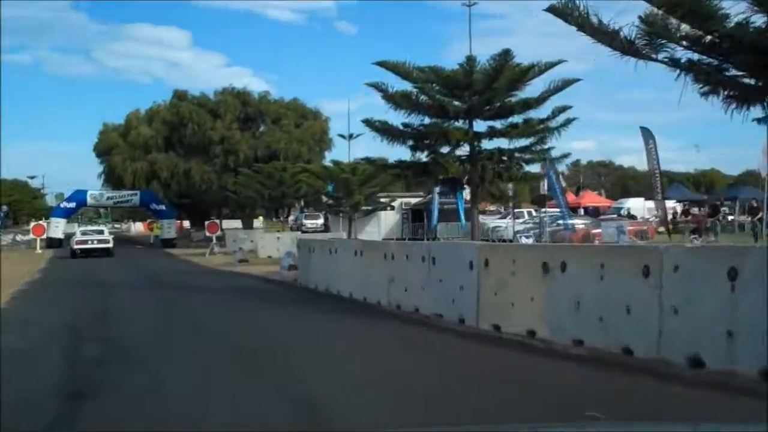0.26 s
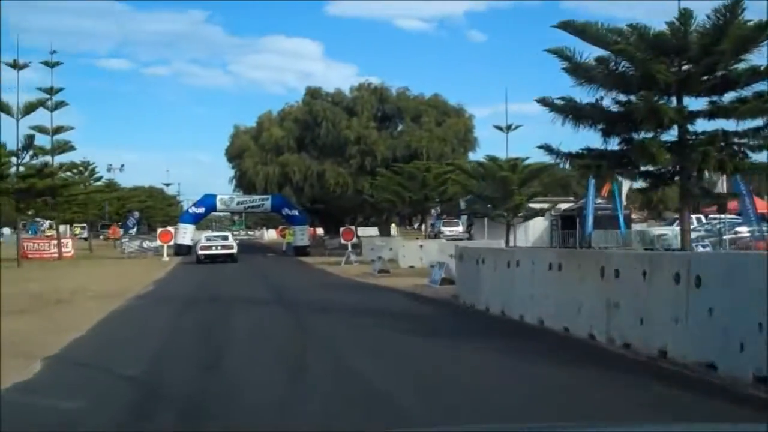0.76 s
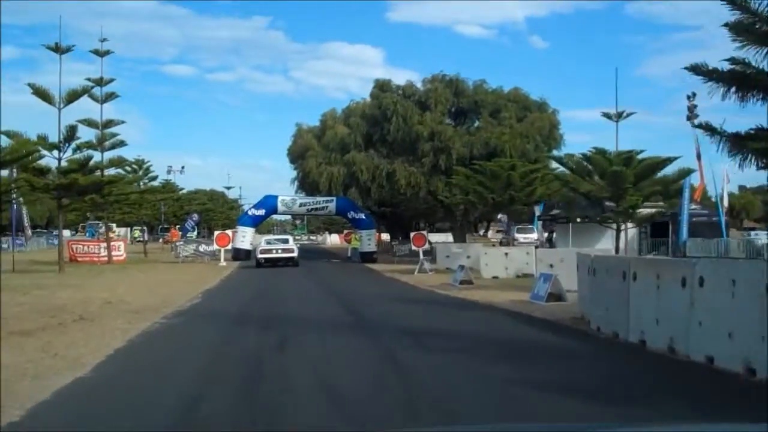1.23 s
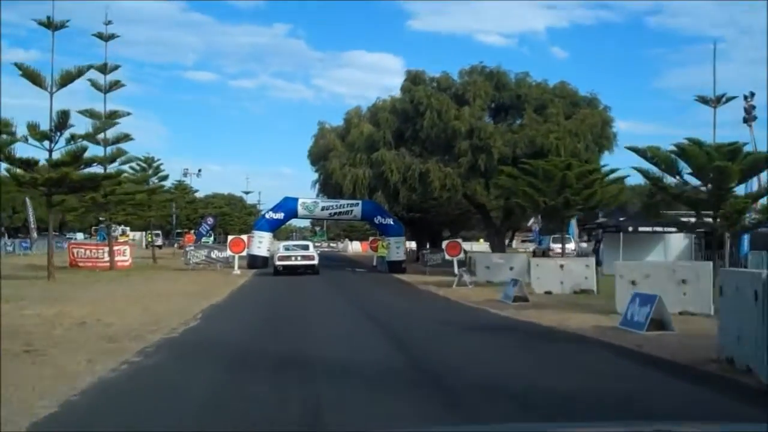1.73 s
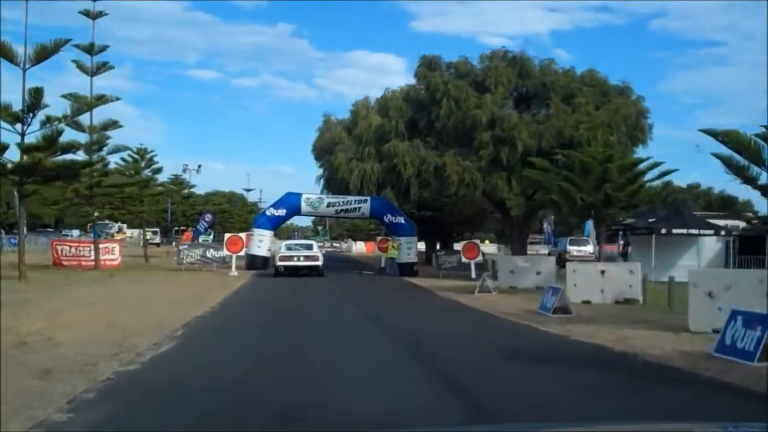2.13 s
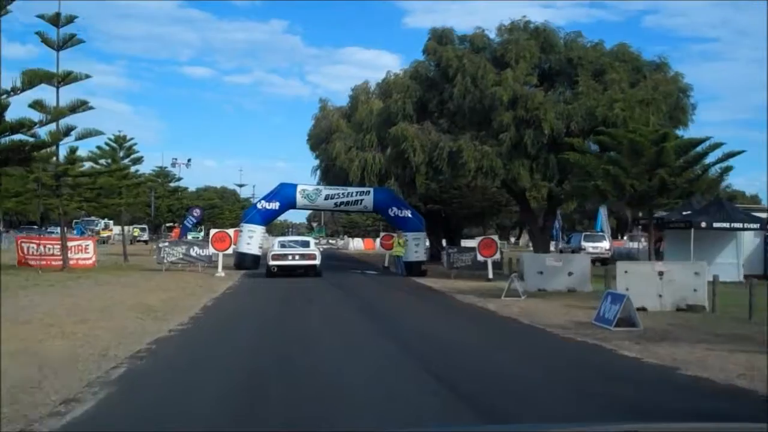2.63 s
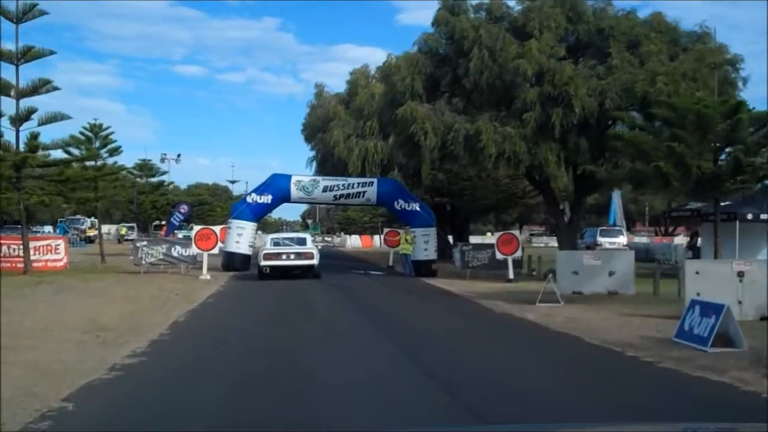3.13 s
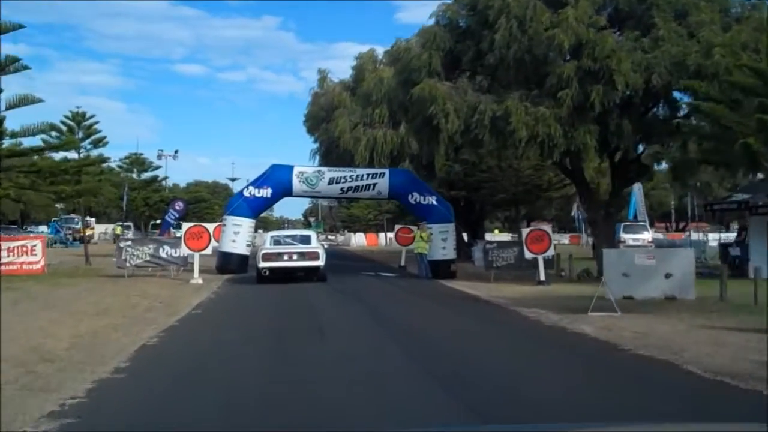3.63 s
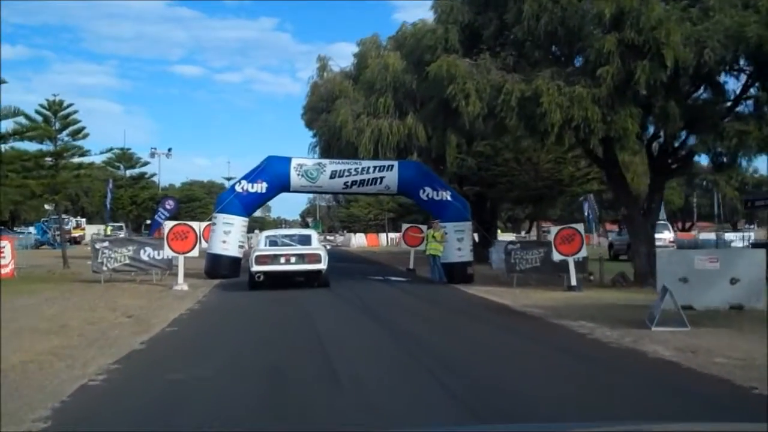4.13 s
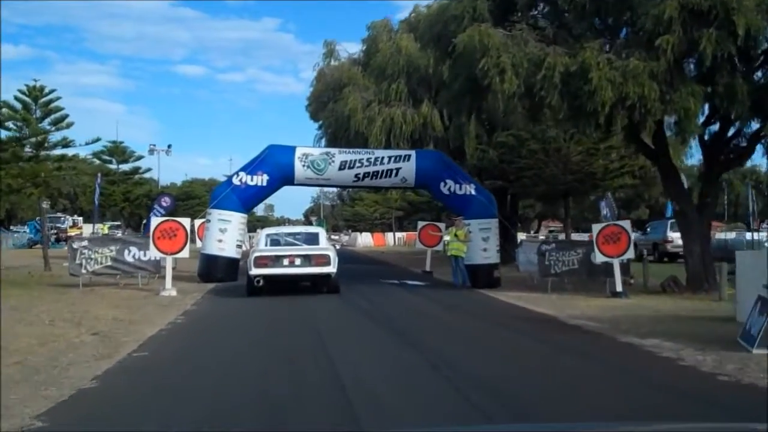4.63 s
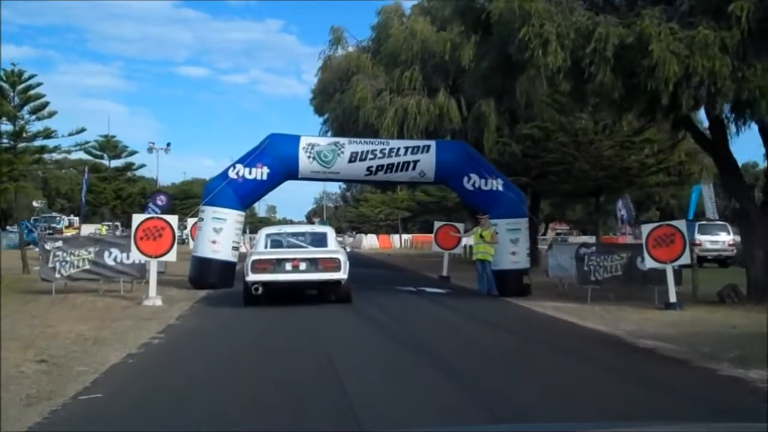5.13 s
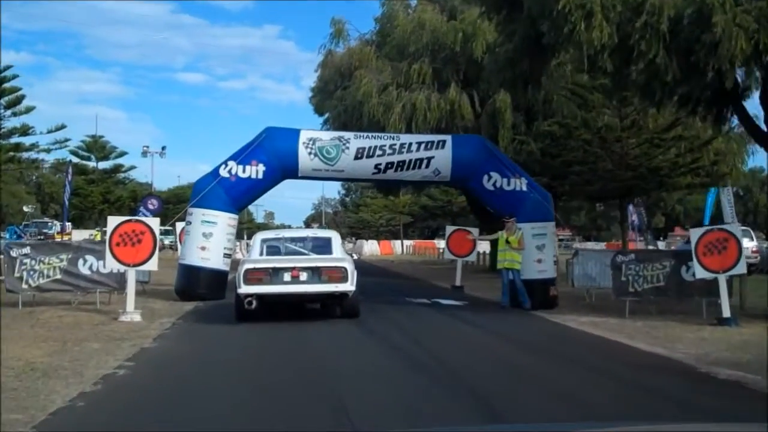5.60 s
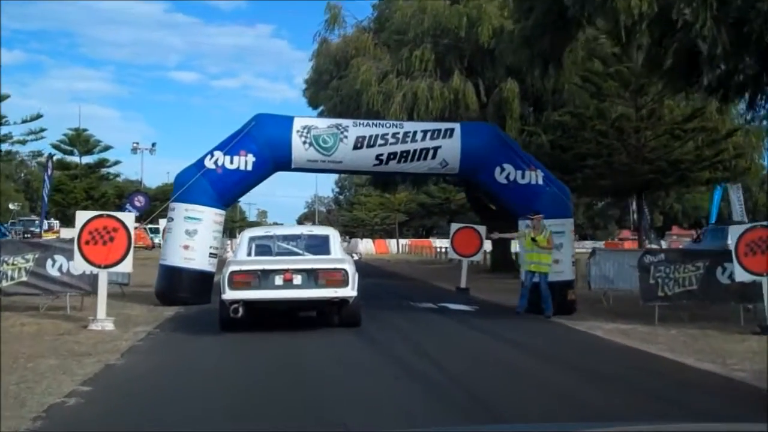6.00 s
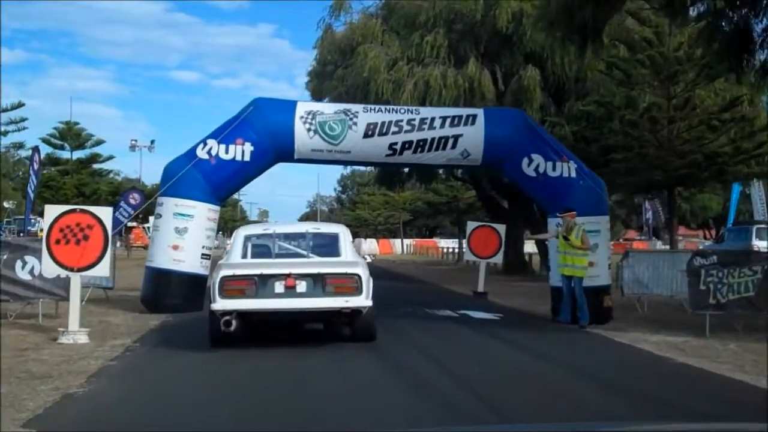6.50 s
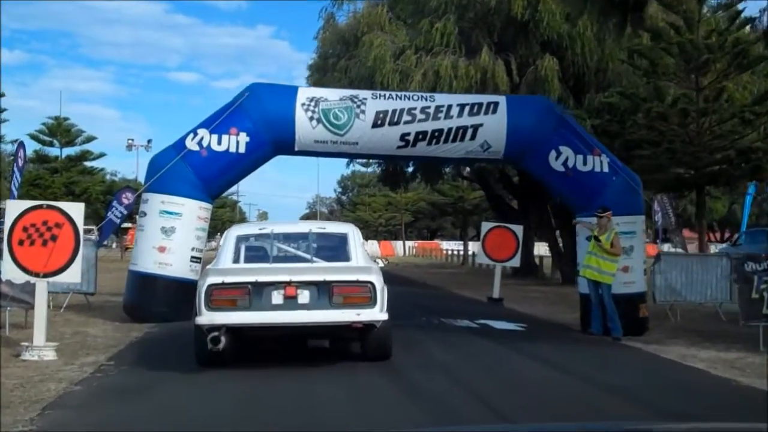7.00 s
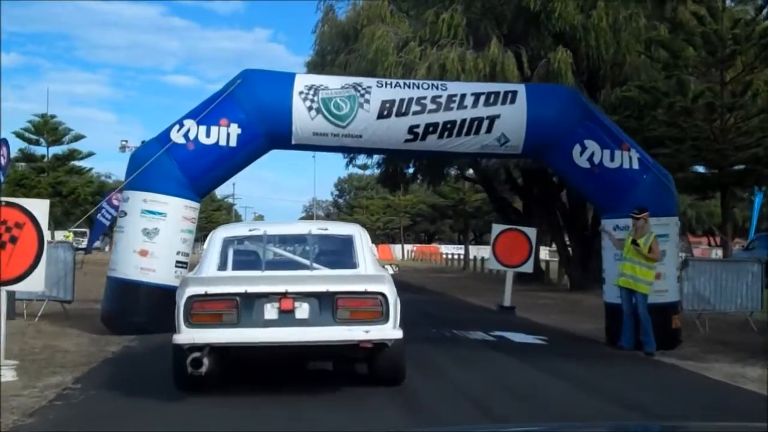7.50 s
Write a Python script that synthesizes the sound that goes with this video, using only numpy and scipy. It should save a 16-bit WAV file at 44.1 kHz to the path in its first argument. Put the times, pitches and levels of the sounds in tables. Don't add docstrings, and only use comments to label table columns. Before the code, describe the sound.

Close cabin sound from a small camera with light hiss. From 0 to 1.4 s the car's own engine booms steadily low, slowly falling, over broad tyre roar; thin brake squeaks chirp near 0, 1 and 1.4 s, with trim and grit ticks. At about 1.5 to 1.75 s a downshift blip rises sharply, followed by more squeaks and a heavy bump at 1.9 s. Revs then slide down to a rough idle by 3.3 s, as road roar fades and an unsteady gear whine descends. Bumps thud around 3.2, 3.4 and 4.6 s; a small throttle nudge lifts the engine from 4.5 to 5.2 s, then it creeps. From 5.3 s a lumpy low idle from the car ahead emerges. It blips at 6.7 to 6.9, 7.05 to 7.17 and 7.26 to 7.35 s, with boomy, ragged barks, then pulls with hot rasp and metallic buzz to the end.

```python
import sys
import numpy as np
from scipy import signal
from scipy.io import wavfile
from scipy.ndimage import uniform_filter1d

SR = 44100
rng = np.random.default_rng(int(sys.argv[2]) if len(sys.argv) > 2 else 0)


def volts_from_db(level):
    exponent = np.asarray(level, float) / 20
    return 10 ** exponent


def store_wav(level_fs):
    pcm = np.round(np.clip(np.atleast_2d(level_fs), -1, 1) * 32767)
    wavfile.write(sys.argv[1], SR, pcm.T.astype(np.int16))


N = 341775


def rms_one(x):
    return x / np.sqrt(np.mean(x ** 2) + 1e-20)


def evened(x, window_s):
    return x / np.sqrt(uniform_filter1d(x ** 2, size=round(window_s * SR)) + 1e-12)


def in_time(rows):
    t_s, *columns = np.transpose(rows)
    return [np.interp(np.arange(N) / SR, t_s, column) for column in columns]


def while_on(start_s, end_s, fade_s):
    corners_s = [start_s - fade_s, start_s, end_s, end_s + fade_s]
    return np.interp(np.arange(N) / SR, corners_s, [0, 1, 1, 0])


def at_hz(points, hz):
    f_hz, value = np.array(points).T
    return np.interp(np.log(hz), np.log(f_hz), value)


def left_right(lean_db):
    return volts_from_db(np.array([[lean_db], [-lean_db]]))


def swells(rows, rise_db_s, fall_db_s):
    t = np.arange(N) / SR
    power = 0
    for peak_s, db in rows:
        below_db = np.where(t < peak_s, rise_db_s * (peak_s - t), fall_db_s * (t - peak_s))
        power = power + volts_from_db(2 * (db - below_db))
    return power


def drift(rate_hz):
    r = np.exp(-80 * np.pi * rate_hz / SR)
    slow = signal.lfilter([1], [1, -2 * r, r * r], rng.standard_normal(N // 40 + 2002))[2000:]
    return np.interp(np.arange(N) / 40, np.arange(len(slow)), rms_one(slow))


def resonate(x, modes):
    out = 0
    for k, (hz, width_hz, db) in enumerate(modes):
        r = np.exp(-np.pi * width_hz / SR)
        poles = [1, -2 * r * np.cos(2 * np.pi * hz / SR), r * r]
        ring = signal.lfilter([(1 - r * r) / 2, 0, (r * r - 1) / 2], poles, x)
        out = out + (-1) ** k * volts_from_db(db) * ring
    return out


def tone(turns, db, wobble_db, wander, rate):
    level = np.sqrt(2) * volts_from_db(db + wobble_db * drift(rate))
    return level * np.sin(2 * np.pi * turns + wander * drift(rate) + rng.uniform(0, 2 * np.pi))


# f/Hz, likeness (1 = same)
LIKENESS = [(60, 0.95), (180, 0.99), (530, 0.94), (1550, 0.61), (4590, 0.02), (13600, 0.07)]
# f/Hz, level/dB
LEAN = [(60, 0.5), (230, 0.5), (900, 0.5), (3500, 1), (13600, -2)]


def banded_noise(spectrum, change_db, patchy_db, first=0):
    out, together = 0, drift(5)
    edges = 60 * 2 ** np.arange(first / 3, 8, 1 / 3)
    white = rng.standard_normal((2, 2, N))
    for k, (low, high) in enumerate(zip(edges, edges[1:])):
        band = signal.butter(2, [low, high], "band", fs=SR, output="sos")
        mid, side = signal.sosfilt(band, white[k % 2])
        hz = np.sqrt(low * high)
        alike = np.clip(at_hz(LIKENESS, hz), 0, 1)
        flicker_db = patchy_db * (0.67 * together + drift(35))
        gain = volts_from_db(at_hz(spectrum, hz) + change_db(hz) + flicker_db)
        stereo = np.sqrt(1 + alike) * mid + np.sqrt(1 - alike) * side * [[1], [-1]]
        out = out + gain * left_right(at_hz(LEAN, hz) / 2) * stereo
    return out


# t/s, firing rate f/Hz, effort level/dB
ENGINE = [
    [(0.0, 114.6, -21), (.5, 110.6, -21), (1.12, 107.8, -21.5), (1.3, 104.4, -24.5), (1.43, 92.5, -26),
     (1.49, 104, -22.5), (1.55, 110.5, -16), (1.65, 143, -13), (1.73, 163, -16)],
    [(1.83, 161, -30), (1.95, 150, -21.5), (2.36, 110.2, -22.5), (2.67, 89.7, -28.5), (3.0, 67, -28),
     (3.27, 47.6, -31), (3.55, 46, -31.5), (4.3, 43, -33), (4.4, 37, -31)],
    [(4.46, 34, -26), (4.57, 47, -25), (4.72, 66.3, -22), (5.13, 72, -23), (5.21, 67, -34), (5.42, 52, -32),
     (5.9, 47.5, -33), (6.62, 42.2, -28), (7.75, 50.2, -24)],
]
# level/dB re firing tone, extra share of effort
OVERTONES = [(-4.5, .05), (-7, 1.37), (-15.5, 0.26)]
# multiple of firing rate, level/dB re firing tone
HALF_ORDERS = [(.5, -29.5), (1.5, -36), (2.5, -28)]
# f/Hz, level/dB
BODY = [(45, -4), (57, 3.5), (85, -2.5), (110, 12), (135, 7), (165, -3), (220, -9.5), (450, -23)]


def engine():
    per_s, effort_db = in_time(np.concatenate(ENGINE))
    turns = np.cumsum(per_s) / SR
    lumpy = np.clip(60 / per_s, 0, 1.3) ** 2
    first_db = effort_db + at_hz(BODY, per_s)
    out = tone(turns, first_db, wobble_db=.6 + 1.6 * lumpy, wander=.1 + .3 * lumpy, rate=14)
    for k, (db, share) in enumerate(OVERTONES, start=2):
        eased_db = share * np.minimum(effort_db + 26, 0)
        overtone_db = effort_db + db + eased_db + at_hz(BODY, k * per_s)
        out += tone(k * turns, overtone_db, wobble_db=2.5, wander=.4, rate=6)
    for k, db in HALF_ORDERS:
        out += tone(k * turns, first_db + db, wobble_db=4.0, wander=0.84, rate=2)
    return out


# f/Hz, level/dB per Hz
ROAR = [(60,-11.5),(85,-16),(110,3.5),(150,-13.5),(220,-9.5),(300,-21.5),(470,-20),(620,-24.5),(750,-31),(1100,-32),(1500,-36),(4000,-44),(8000,-54),(14000,-63)]
ROAD_PER_OCTAVE_DB = [8.5, 8, 7]
ROAD_FOLLOWS = [0.25, .25, 0.18]
ROAD_TRIM_DB = [1.5, 1.5, 0.5]
# t/s, level/dB
ROUGH_PATCHES = [(.37, 6.5), (.48, 3), (1.38, 2.5), (1.52, 3), (4.38, 2)]


def road():
    octaves = np.log2(in_time(SPEED)[0] / 180)
    effort_db = in_time(np.concatenate(ENGINE))[1] + 28
    coarse_db = 10 * np.log10(1.5 + swells(ROUGH_PATCHES, rise_db_s=122.5, fall_db_s=26.5))
    levels_db = np.outer(ROAD_PER_OCTAVE_DB, octaves) + np.transpose([ROAD_TRIM_DB])
    levels_db = levels_db + np.outer(ROAD_FOLLOWS, effort_db + 2 * coarse_db)

    def change_db(hz):
        share = [at_hz(np.transpose([[230, 600, 4000], row]), hz) for row in np.eye(3)]
        return np.dot(share, levels_db)

    return volts_from_db(-8.5) * banded_noise(ROAR, change_db, patchy_db=0.78)


# f/Hz, level/dB per Hz
SELF_NOISE = [(2000, -59.5), (5000, -49.5), (7900, -54.5), (10000, -55.5), (14000, -71.5)]


def microphone_hiss():
    return volts_from_db(-5.5) * banded_noise(SELF_NOISE, lambda hz: 0, patchy_db=-1.0, first=12)


# t/s, length/s, f/Hz, level/dB, octave level/dB
SQUEAKS = [(-.04, 0.18, 1745, -44.5, -63), (.08, 0.14, 1733, -44.5, -59), (.66, .07, 1730, -53.5, -65),
           (.95, 0.13, 1750, -42.5, -59), (1.03, 0.084, 1797, -44, -64), (1.41, 0.064, 1600, -47, -70),
           (.51, 0.061, 3200, -59, -85), (1.7, .14, 1760, -38.5, -61.5), (1.82, 0.14, 1758, -38, -55.5),
           (2.23, 0.11, 1780, -51.5, -54.5), (5.75, .11, 1731, -53, -68), (3.07, 0.076, 3266, -51, -88)]


def brakes():
    out, waver, flutter = np.zeros(N), drift(30), drift(45)
    for start_s, length_s, hz, first_db, octave_db in SQUEAKS:
        on = np.arange(max(round(start_s * SR), 0), round((start_s + length_s) * SR))
        phase = 2 * np.pi * hz * on / SR + 0.31 * waver[on]
        swell = np.sin(np.pi * (on / SR - start_s) / length_s) ** 0.99 * volts_from_db(2.9 * flutter[on])
        for k, db in enumerate([first_db, octave_db, first_db - 24], start=1):
            out[on] += swell * np.sqrt(2) * volts_from_db(db) * np.sin(k * phase)
    return out * left_right(1.5)


# t/s, level/dB
BUMPS = [(.36, -28), (.46, -30), (.84, -27.5), (1.13, -29), (1.31, -25), (1.49, -18.5), (1.9, -13),
         (2.4, -25.5), (3.17, -18.5), (3.41, -20.5), (3.72, -24.5), (4.62, -17), (4.8, -35), (5.13, -25.5),
         (5.44, -21.5), (5.84, -31), (6.25, -21.5), (6.73, -19), (6.86, -34)]
# f/Hz, width/Hz, level/dB
CABIN = [(22, 27, -6), (49, 24, -1.5)]


def thuds():
    air = resonate(rng.standard_normal(N), CABIN)
    shake = evened(resonate(air, [(40, 180, 0)]), 1.0)
    steady_db = -32
    power = volts_from_db(2 * steady_db) + swells(BUMPS, rise_db_s=70.5, fall_db_s=158.5)
    return np.sqrt(power) * volts_from_db(-1.0) * shake


# t/s, bright peak level/dB, dull level/dB, left-minus-right level/dB
TICKS = [(0.095, -43.5, -39.5, -3.5), (0.3133, -48.5, -38, 7), (0.449, -56, -40, -4),
         (0.764, -39.5, -43, -6), (0.781, -48.5, -42, -1), (1.1116, -54, -46, 1), (1.1785, -42.5, -47, 1),
         (1.2638, -43.5, -47, 2), (1.431, -50, -44, 3), (1.5222, -43.5, -50, -3.5), (1.559, -65, -37, 1),
         (1.6633, -50, -52, -8), (1.7767, -56, -48, -3), (2.1977, -50, -47, -7), (2.425, -43, -44, -5),
         (2.65, -50, -52.5, -4), (2.7494, -51, -46.5, -1), (2.831, -49.5, -69, -1), (3.7957, -45, -51, -3),
         (3.9313, -56.5, -46, -3), (4.3973, -37.5, -40.5, -3), (5.3538, -65, -46.5, 4),
         (5.647, -62, -39.5, 5), (5.713, -61, -56, -3), (6.1905, -57, -45, 0), (6.417, -64, -56, 0.5),
         (7.4022, -46, -41.5, -4)]
# f/Hz, width/Hz, level/dB
TICK_BRIGHT = [(9050, 5700, 0), (11500, 4400, -9)]
# f/Hz, width/Hz, level/dB
TICK_DULL = [(1680, 380, 7.5), (4080, 1500, -3.5)]


def ticks():
    out, t = np.zeros((2, N + 4096)), np.arange(4096) / SR
    t60_s = 0.048
    for start_s, bright_db, dull_db, lean_db in TICKS:
        noise = rng.standard_normal((3, 4096))
        burst = (noise[0] + 0.12 * noise[1:]) * volts_from_db(-60 * t / t60_s)
        bright = resonate(resonate(burst, TICK_BRIGHT), TICK_BRIGHT)
        dull = resonate(resonate(burst, TICK_DULL), [(2500, 10000, 0)])
        both = volts_from_db(bright_db + 0.5) * bright / np.abs(bright).max()
        both = both + volts_from_db(dull_db + 6) * dull / np.abs(dull).max()
        at = round(start_s * SR)
        out[:, at:at + 4096] += both * left_right(lean_db / 2)
    return out[:, :N]


# t/s, f/Hz, whine level/dB
SPEED = [(0.0, 312, -50), (1.9, 285.7, -48.5), (2.3, 280.3, -40), (2.55, 264.1, -43.5), (2.8, 237, -34),
         (3.1, 206.2, -34), (3.35, 193, -42), (3.6, 185.2, -38.5), (4.3, 170.8, -49), (5.4, 146.3, -31),
         (6.6, 118.2, -47)]


def whine():
    hz, db = in_time(SPEED)
    turns = np.cumsum(hz) / SR
    mesh = tone(turns, db - 2, wobble_db=4, wander=.7, rate=7)
    side = tone(3 / 2 * turns, db - 15, wobble_db=4, wander=.7, rate=7)
    return (mesh + side) * while_on(2.1, 5.4, fade_s=0.28)


# t/s, firing rate f/Hz, level/dB
AHEAD_IDLE = [(5.3, 136, -36.5), (5.75, 144.4, -34), (6.249, 136, -32), (6.5, 110, -30), (6.68, 136, -34.5)]


def ahead_idling():
    per_s, db = in_time(AHEAD_IDLE)
    turns = np.cumsum(per_s) / SR
    lower = tone(turns, db, wobble_db=2, wander=.4, rate=8)
    upper = tone(4 / 3 * turns, db - 4, wobble_db=3, wander=.5, rate=8)
    return (lower + upper) * while_on(AHEAD_IDLE[0][0], AHEAD_IDLE[-1][0], fade_s=0.18)


# opens t/s, fully open t/s, shuts t/s, bark level/dB
BLIPS = [
    (6.667, 6.885, 6.92, -24.5),
    (7.035, 7.074, 7.17, -20),
    (7.258, 7.287, 7.35, -20.5),
    (7.352, 7.403, 7.7, -29),
]


def throttle(per_s):
    t = np.arange(N) / SR
    open_db, sag_db, shut_s = 25.5, 4.5, 0.024
    overrun_db = -35 + 15 * np.log2(per_s / 200)
    power = volts_from_db(2 * overrun_db)
    below_db = np.array([60, open_db, 0, sag_db, open_db, 60])
    for opens, full, shuts, db in BLIPS:
        corners_s = [opens - .1, opens, full, shuts, shuts + shut_s, shuts + 3 * shut_s]
        power = power + volts_from_db(2 * np.interp(t, corners_s, db - below_db))
    return 10 * np.log10(power)


# level/dB, lateness as share of firing gap
CYLINDERS = [(3.0, 0.0), (-4.0, .22), (0.0, -.15), (2.0, .1), (-5.0, -.25), (-1.0, .3)]


def exhaust_gas(turns, per_s, load):
    firing = np.arange(1, int(turns[-1]) - 1)
    strength_db, late = np.array(CYLINDERS)[firing % 6].T
    chance = rng.standard_normal((len(firing), 2))
    at = np.interp(firing + late, turns, np.arange(N)).astype(int)
    jitter = (.018 + .015 * load[at]) * chance[:, 0] * SR / per_s[at]
    at = np.clip(at + jitter.astype(int), 0, N - 1)
    pulses = np.zeros(N) + 1e-18
    pulses[at] = volts_from_db(strength_db + (1 + 2 * load[at]) * chance[:, 1])
    pulses = evened(pulses, 0.044)
    puffs = evened(signal.lfilter([.01], [1, -.99], pulses), 0.12)
    gas = pulses + (.2 + .1 * load) * puffs * rng.standard_normal(N)
    pipe = signal.butter(2, 1300, fs=SR, output="sos")
    return signal.sosfilt(pipe, gas), puffs


# f/Hz, width/Hz, level/dB
SILENCER = [(125, 62, -1), (193, 91, 2.5)]
# t/s, level/dB
SINGING = [(6.72, -20.5), (6.84, -12.5), (6.9, -20), (7.075, -22), (7.145, -6.5), (7.23, -23), (7.315, -12),
           (7.46, -27), (7.55, -19.5), (7.66, -27)]


def silencer_boom(gas, turns, boom_db):
    sing_db = 10 * np.log10(swells(SINGING, rise_db_s=341, fall_db_s=171) + 1e-9)
    tone_db = sing_db - boom_db
    boom = evened(resonate(resonate(gas, SILENCER), SILENCER), 0.079) * 1.25
    boom = boom + tone(turns, tone_db, wobble_db=-2.0, wander=0.78, rate=11.8)
    return boom + tone(3 * turns, tone_db - 18, wobble_db=3, wander=1.2, rate=15)


# f/Hz, level/dB per Hz
RASP = [(710, -30), (1200, -1.5), (1570, -11), (2060, -6.5), (4210, -13), (5040, -8.5), (5460, -14.5),
        (13000, -34.5)]
# f/Hz, width/Hz, level/dB
SHIELD = [(2070, 170, -3.5), (2860, 57, -3.5), (3760, 240, -3.5), (5200, 200, -10.5), (6350, 380, -1)]
# t/s, level/dB
GUSTS = [(6.75, -59), (6.87, -54), (7.12, -43.5), (7.33, -48), (7.45, -48), (7.56, -50)]


def gas_rasp(puffs, per_s):
    steady_db = -59.5
    power = volts_from_db(2 * steady_db) + swells(GUSTS, rise_db_s=131.5, fall_db_s=79)
    rasp_db = 10 * np.log10(power)
    since_pull_s = np.arange(N) / SR - BLIPS[-1][0]
    buzz_db = -9 + 19 * np.log2(per_s / 200) + 11.5 * since_pull_s
    rasp = rms_one(banded_noise(RASP, lambda hz: 0, patchy_db=1.0, first=13))
    rasp = rasp * (1.09 + .15 * puffs)
    buzz = volts_from_db(buzz_db) * rms_one(resonate(rng.standard_normal((2, N)), SHIELD))
    return volts_from_db(rasp_db + 2.0) * (rasp + buzz)


# t/s, firing rate f/Hz
AHEAD_SPEED = [(6.62, 77.7), (6.76, 103.4), (6.82, 136), (6.92, 172), (7.05, 187), (7.12, 198), (7.35, 200),
               (7.43, 202), (7.75, 172)]
# f/Hz, width/Hz, level/dB
TAILPIPE = [(345, 30.4, 9.5), (427.5, 45, 3), (478.4, 8.6, 6.5), (535, 52, -3), (610, 56, -5.5),
            (802, 48, -12.5), (894, 52, -18.5), (1110, 167, -17.5)]


def car_ahead():
    per_s, = in_time(AHEAD_SPEED)
    turns = np.cumsum(per_s) / SR
    bark_db = throttle(per_s)
    boom_db = -22 + 0.89 * (bark_db + 27)
    load = np.clip((bark_db + 36) / 14, 0, 1)
    gas, puffs = exhaust_gas(turns, per_s, load)
    bark = evened(resonate(gas, TAILPIPE), 0.07)
    boom = silencer_boom(gas, turns, boom_db)
    near = volts_from_db(bark_db + 0.4) * bark + volts_from_db(boom_db - 3.0) * boom
    both = near * left_right(.3) + gas_rasp(puffs, per_s)
    return both * while_on(AHEAD_SPEED[0][0], N / SR, fade_s=0.093)


def scene():
    low = (engine() + thuds() + whine() + ahead_idling()) * left_right(.6)
    return low + road() + microphone_hiss() + brakes() + ticks() + car_ahead()


def low_pass(x):
    return signal.sosfilt(signal.butter(12, 14190, fs=SR, output="sos"), x)


def record(dry):
    dull = signal.sosfilt(signal.butter(2, 11500, fs=SR, output="sos"), dry)
    mix = 1.162 * np.tanh(dull / 1.269)
    return low_pass(mix)


dry = scene()
out = record(dry)
store_wav(out)
```